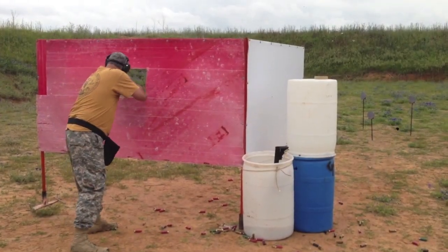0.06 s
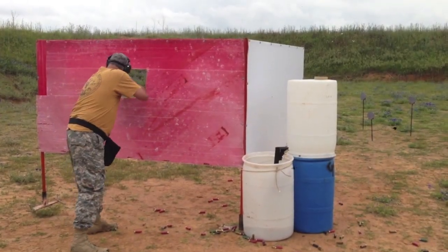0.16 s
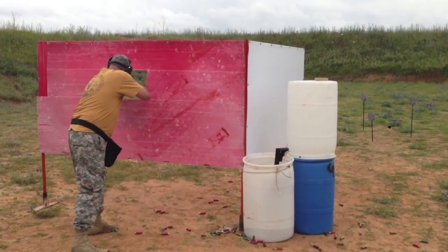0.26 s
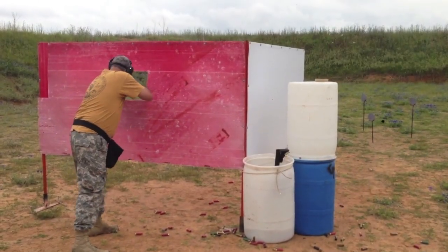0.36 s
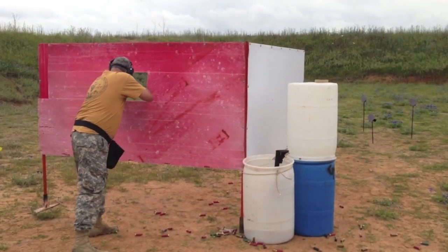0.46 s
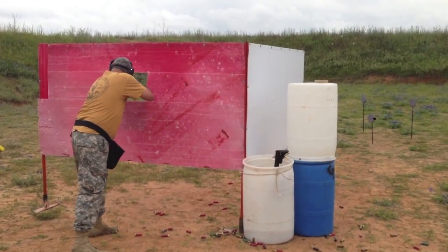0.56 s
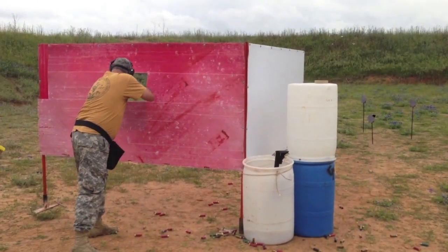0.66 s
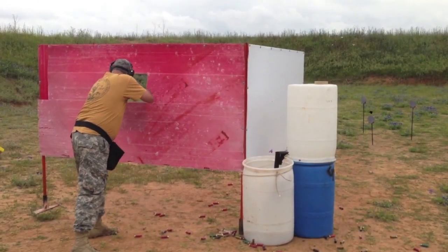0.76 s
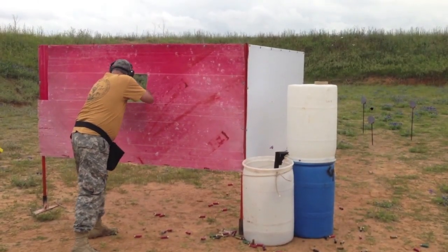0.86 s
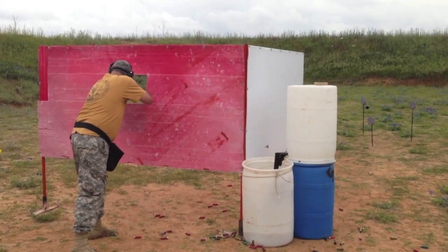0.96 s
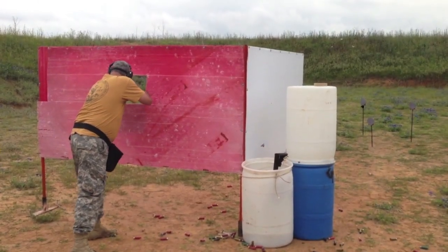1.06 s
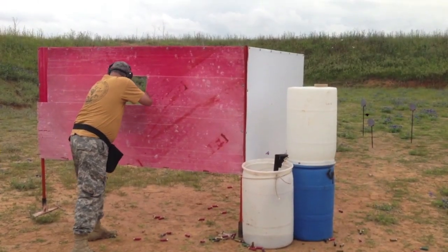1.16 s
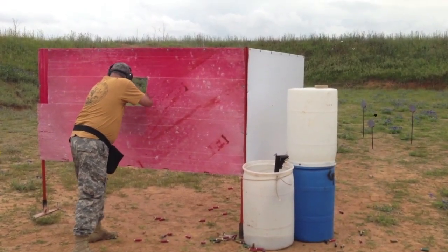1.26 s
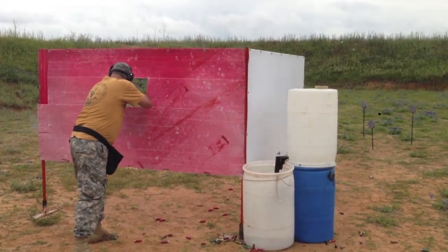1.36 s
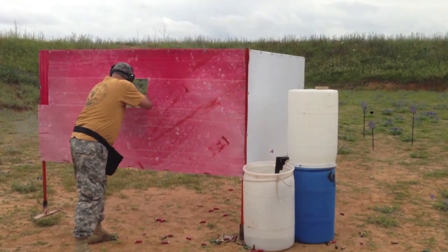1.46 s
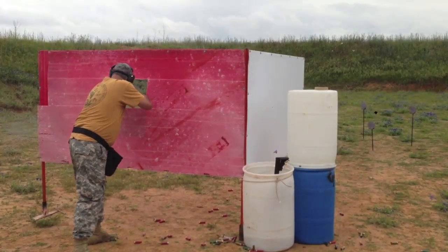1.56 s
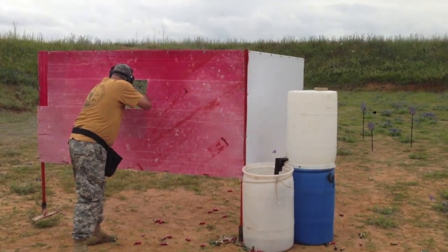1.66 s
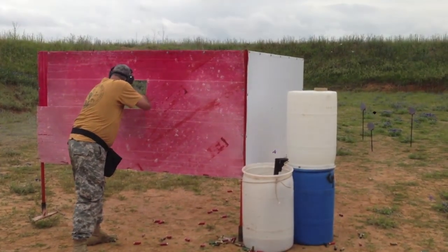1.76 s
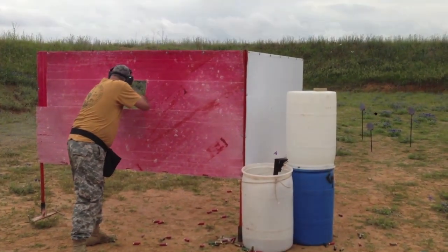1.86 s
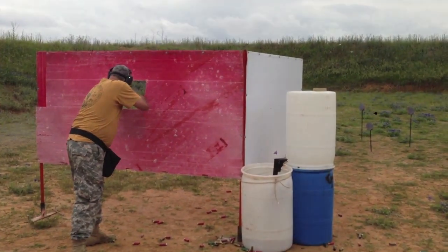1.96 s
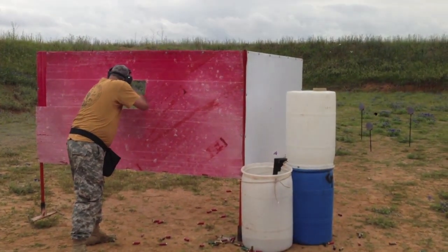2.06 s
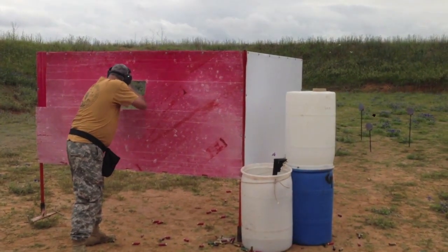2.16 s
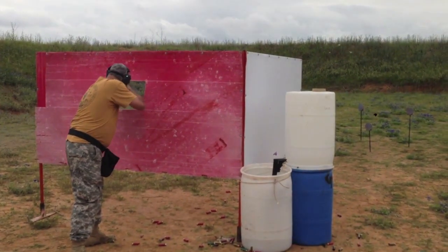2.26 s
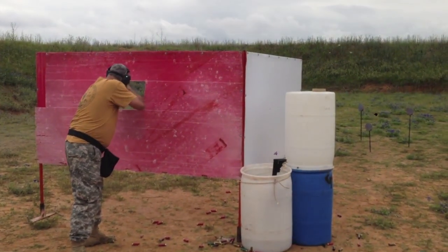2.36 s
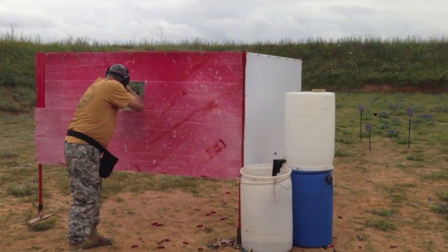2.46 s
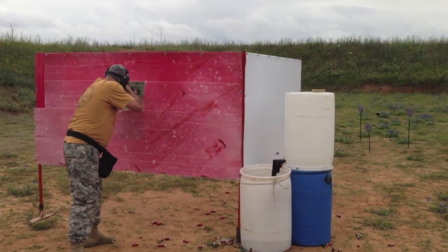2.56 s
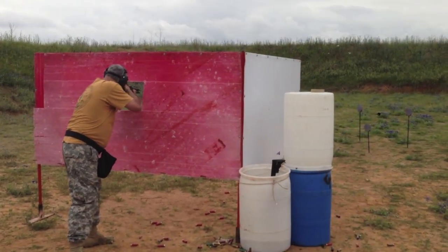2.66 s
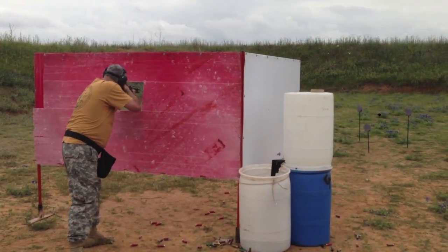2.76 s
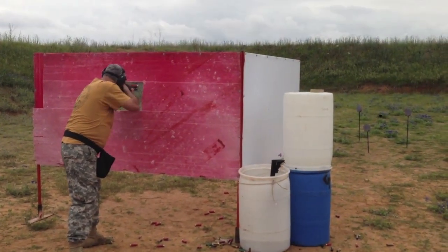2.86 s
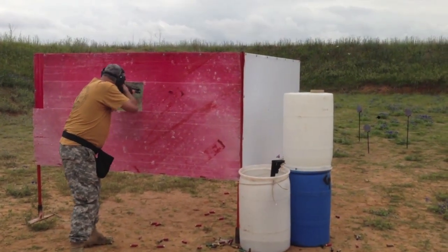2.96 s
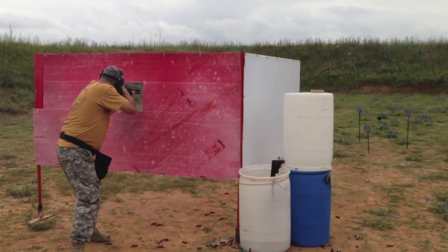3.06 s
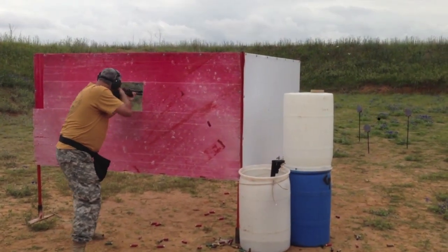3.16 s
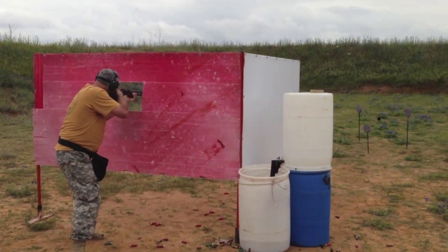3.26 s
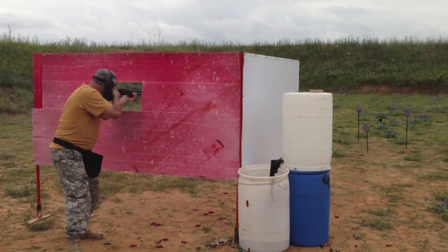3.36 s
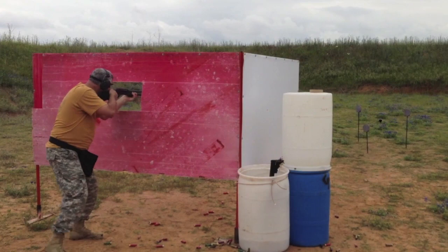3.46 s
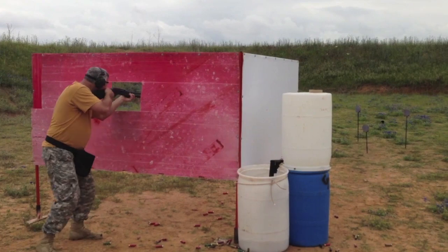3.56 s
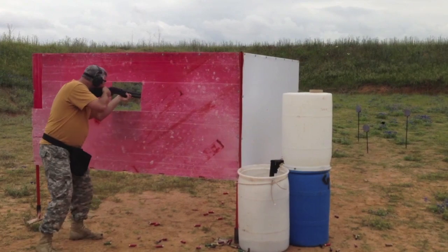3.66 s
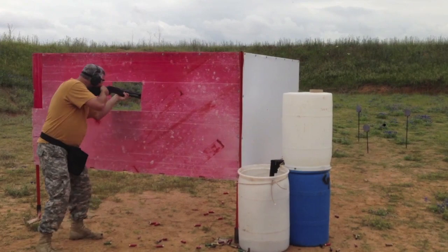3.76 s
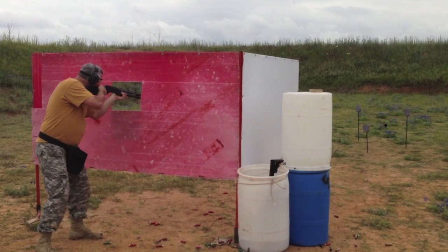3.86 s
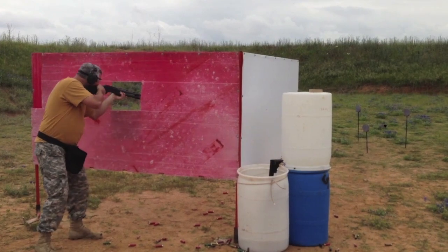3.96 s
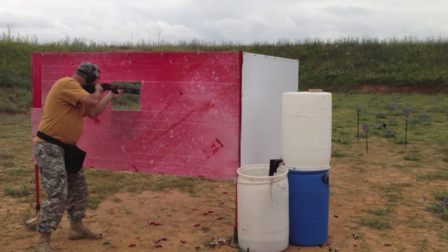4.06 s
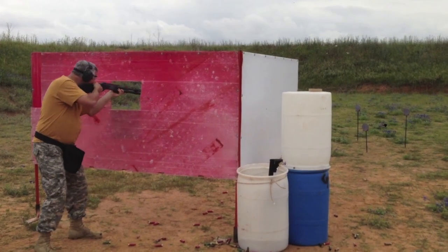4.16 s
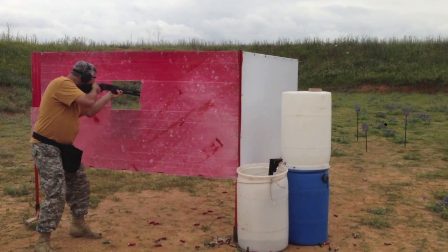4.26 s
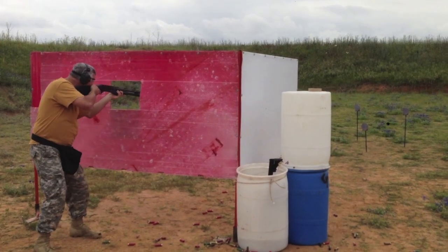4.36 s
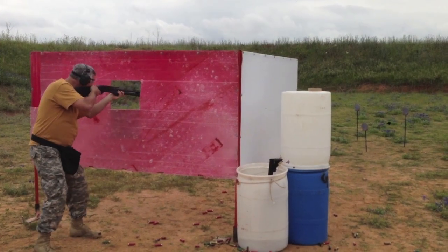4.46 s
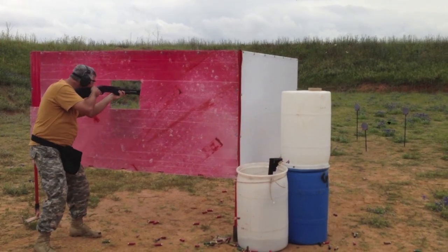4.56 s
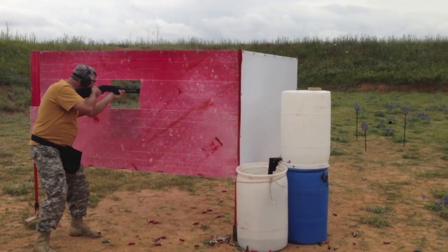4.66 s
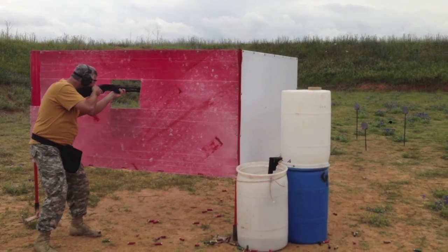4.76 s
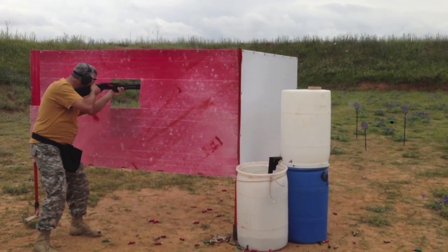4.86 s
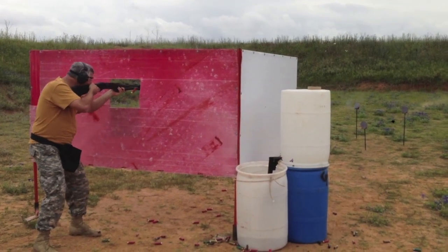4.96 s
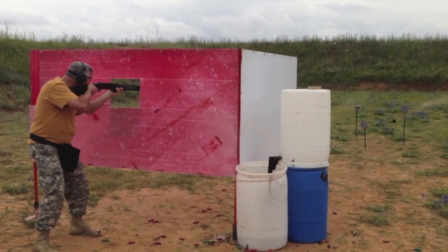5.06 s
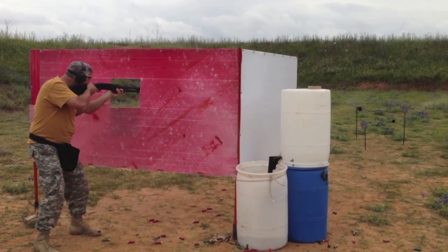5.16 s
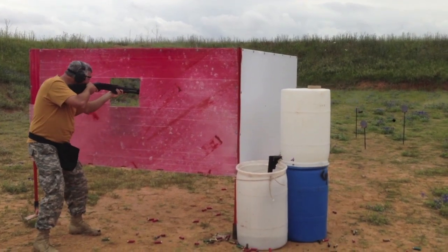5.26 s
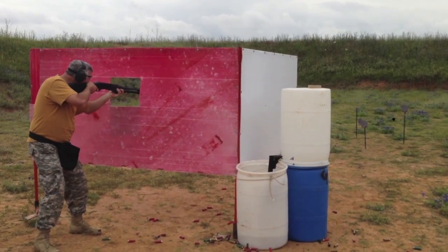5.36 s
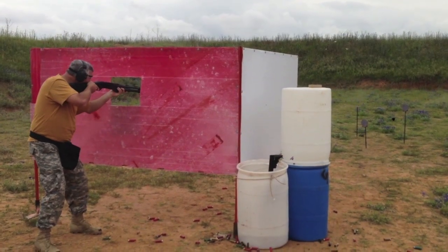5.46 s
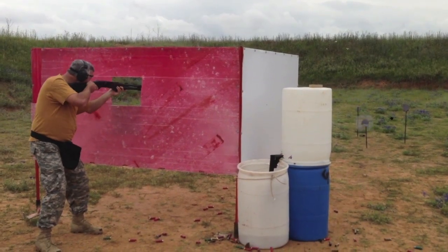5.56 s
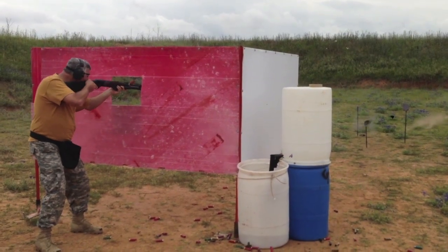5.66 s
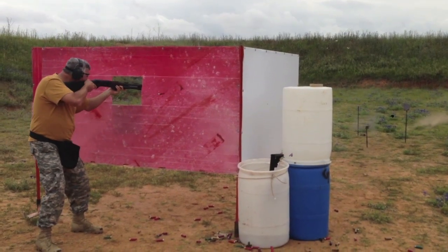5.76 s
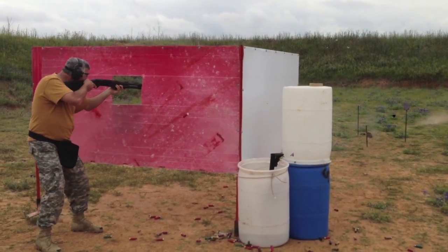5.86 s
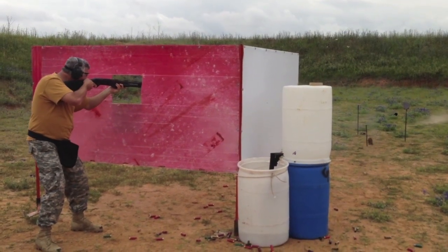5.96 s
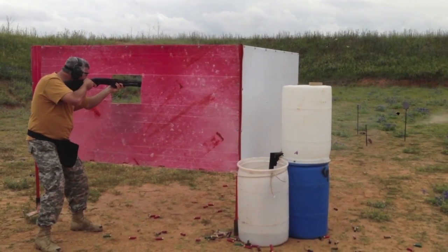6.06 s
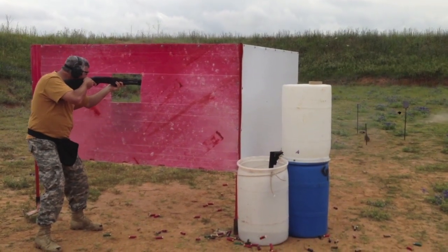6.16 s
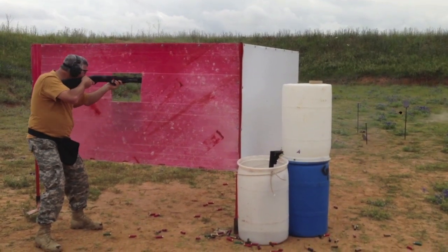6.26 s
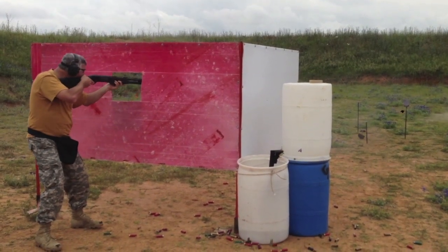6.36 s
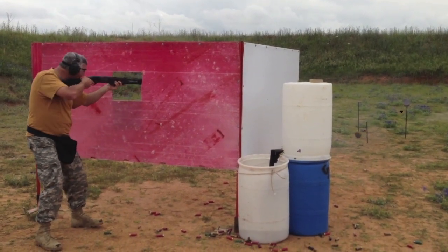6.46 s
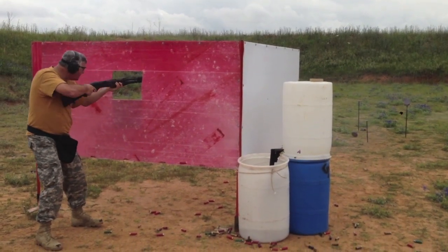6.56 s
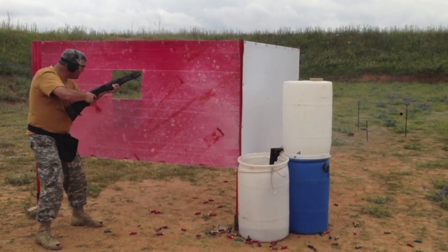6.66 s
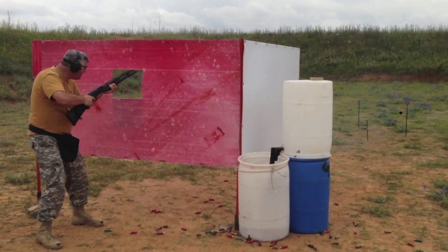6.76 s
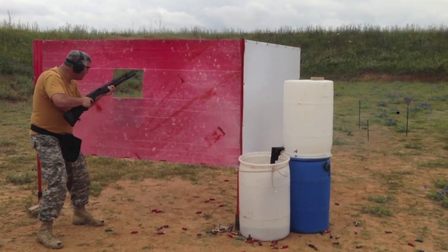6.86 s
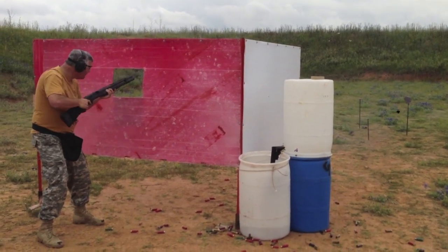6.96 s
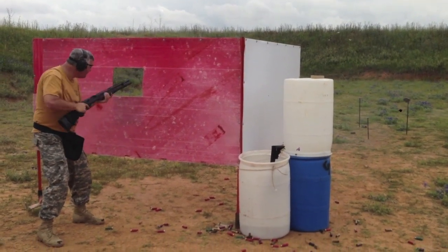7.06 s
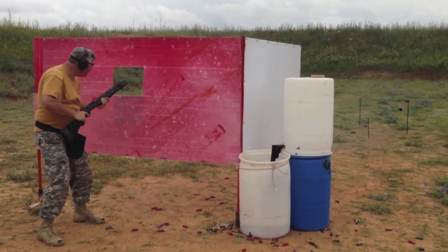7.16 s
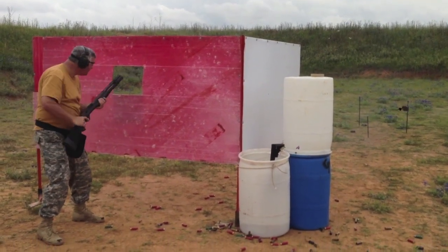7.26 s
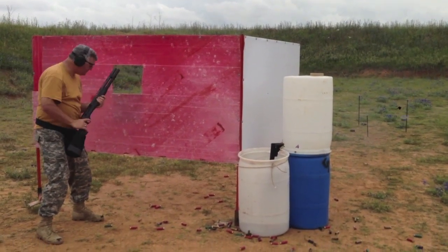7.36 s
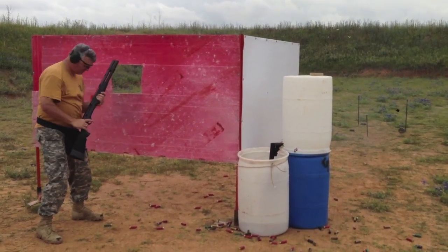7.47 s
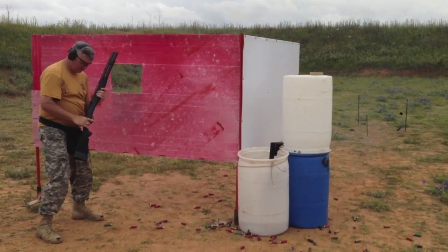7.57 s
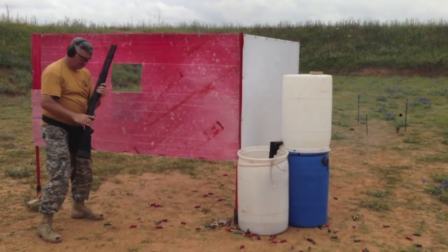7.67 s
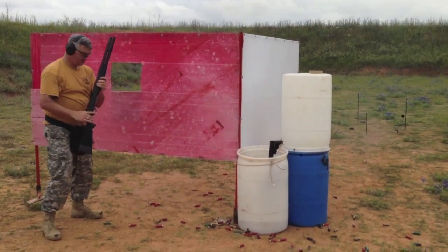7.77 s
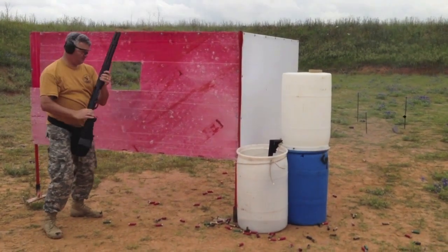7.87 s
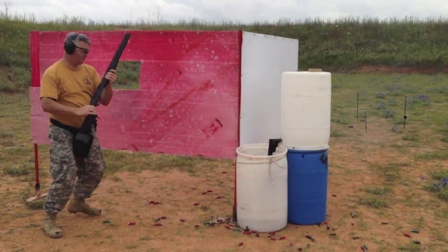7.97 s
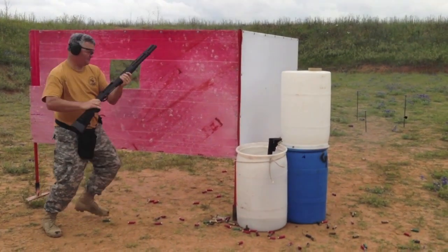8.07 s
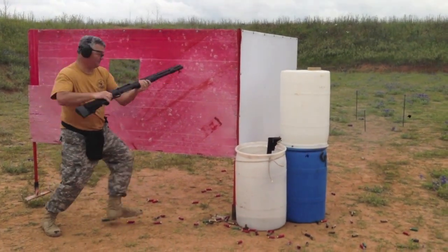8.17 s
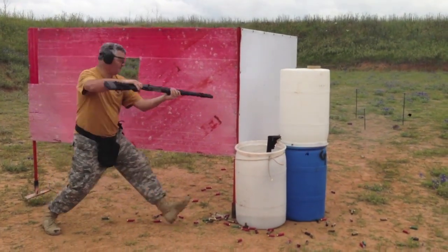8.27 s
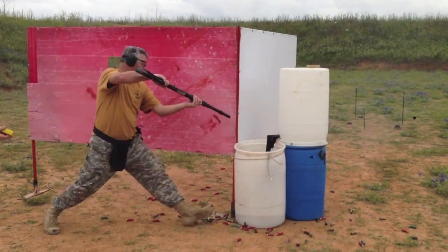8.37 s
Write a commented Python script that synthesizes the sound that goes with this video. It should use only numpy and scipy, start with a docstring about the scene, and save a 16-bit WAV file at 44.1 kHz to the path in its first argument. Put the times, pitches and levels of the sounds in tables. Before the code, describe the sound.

Quiet open air with soft thuds, a tiny tick and faint far chirps, then seven very loud shotgun blasts over about five seconds, three first, a short gap, then four. Each cracks, thumps and slaps back briefly from boards and earth banks, followed by metallic action clacks. Empty hulls knock on the ground and distant steel plates ring faintly. Afterwards only small clicks, a dull thud and light rustle remain. The microphone is outdoors, a few metres behind the shooter.

```python
"""Shotgun on an open range

Seven shots from a self-loading shotgun fired through a port in a board wall, heard from behind the wall.
Each blast is shaped noise with echoes, ringing boards and a low thump; the action and empty hulls clack.
Steel plates are fading tones that swell as they spin. Soft thuds are low tones, far birds are gliding
whistles, and the rustle, low murmur and open air are filtered noise."""
import sys
import numpy as np
from scipy import signal
from scipy.fft import rfft, irfft
from scipy.io import wavfile
from scipy.ndimage import uniform_filter1d

SR = 44100
rng = np.random.default_rng(int(sys.argv[2]) if len(sys.argv) > 2 else 0)


def volts_from_db(level):
    """Convert decibel levels to linear amplitude ratios."""
    exponent = np.asarray(level, float) / 20
    return 10 ** exponent


def master(y):
    """Save y as 16-bit WAV."""
    cut = np.clip(np.atleast_2d(y).T, -1, 1)
    pcm = np.round(cut * 32767)  # scale
    wavfile.write(sys.argv[1], SR, pcm.astype(np.int16))


N = 371322
TIME = np.arange(N) / SR

# blasts: (t/s, level/dB, thump relative level/dB, body relative level/dB, hammer falls this long before/s)
BLASTS = [(1.403, -1.35, -3.5, 1.5, .02), (2.1948, -2.2, -0.9, -1.5, .021),
          (2.9456, -2.1, -1.8, -1.5, .022), (4.1459, -1.7, -2.2, -0.5, .021),
          (4.9741, -1.7, -0.8, -1.4, .023), (5.682, -0.3, -3.5, -2.26, .02),
          (6.3301, -0.43, -3.4, -0.5, .026)]
# tone colour of the blast noise: (f/Hz, relative level/dB)
BLAST_COLOUR = [(150, -25), (250, -3), (499, -9), (624, -7), (961, -5), (1510, -8), (2200, -6),
                (2530, -10.5), (3450, -4.5), (11200, -16.5), (13500, -23), (15500, -30.5)]


def shots():
    """Pressure blasts meet the same reflectors each time, so much of their low scatter is alike."""
    out = np.zeros(N)
    before_s, length_s = .03, .73
    t = TIME[:int(length_s * SR)] - before_s
    gains = echoes(t)
    boom = thump(t, gains[-1])
    push = volts_from_db(-31.5) * ring(t - .004, 50, 0.023)  # a short deep push at the blast
    swell = volts_from_db(-34.5) * np.exp(-((t + 0.0027) / 0.0039) ** 2)
    common = colour(rng.standard_normal(len(t)), BLAST_COLOUR)
    for s, db, boom_db, body_db, lead in BLASTS:
        own = colour(rng.standard_normal((3, len(t))), BLAST_COLOUR)
        returned = scatter(t, common, own, gains, body_db)
        returned = np.clip((t + lead) / 0.0022, 0, 1) * returned  # silent until the hammer falls
        wall = volts_from_db(body_db) * boards(t)
        low = volts_from_db(boom_db) * (boom + push)
        barrel = swell * unit(band(own[1], 3000, 3200))  # it sings while the charge runs down it
        add(out, s + t[0], volts_from_db(db) * (returned + wall + low + barrel))
        add(out, s - lead, click(db=-31.0, hz=4000, knock_db=-14, hull_db=-41.5))  # the hammer falls
    return out


def scatter(t, common, own, gains, body_db):
    """Low, middle and treble noise follow the echo gains; uneven near reflectors blend with distance."""
    level, body, edge, _ = gains
    low = volts_from_db(body_db) * body * unit(band(1.4 * common + 0.53 * own[0], 220, 1900))
    # the soft ground swallows this band from later returns
    low = low - (1 - np.exp(-np.maximum(t, 0) / .09)) * band(low, 380, 620)
    middle = level * unit(band(own[1], 1500, 5500))
    treble = edge * unit(band(own[2], 6600, 23000))
    unevenness = np.exp(-np.maximum(t, 0) / 1.3)
    shared = walk(450, count=len(t))
    mix = 0
    for layer in (low, middle, treble):
        mix = mix + layer * volts_from_db(unevenness * (1.8 * shared + 2 * walk(250, count=len(t))))
    return mix + volts_from_db(3) * level * glints(count=70, span_s=.3)[:len(t)]


# blast and slaps from wall, drums and banks: (t after blast/s, level/dB, hold/s, body relative level/dB)
SLAP_ECHOES = [(.0022, -13, .0075, -4), (.015, -22, .002, -2.5), (0.021, -32, .004, 5.5),
               (.05, -31.5, .004, -5.5), (.078, -34, .024, -2.5), (0.142, -33.5, 0.0044, -25),
               (.194, -34.5, .008, -7), (0.208, -36, 0.024, -1.5)]


def echoes(t):
    """Gains of the middle, body, treble and bass roll: powers of all echo paths are summed."""
    rise_db_s, fall_db_s = 4200, 1500
    arrived = peak(t, .004, 1, rise_db_s, 0)
    bay = arrived * peak(t, -1, 1 + .235, 0, 450)  # the bay fades fast after its rear bank
    near = bay * volts_from_db(-28.5 - 85 * t)  # dense scatter from the ground inside the bay
    far = arrived * volts_from_db(-27.5 - 78 * t)  # scrub beyond the banks
    fizz = (t < .004) * volts_from_db(-38 + 450 * t)  # the charge burns in the barrel before the blast leaves
    level_parts, body_parts = [fizz, near, far], [fizz, volts_from_db(-3.5) * near, volts_from_db(-5) * far]
    for s, db, hold, body_db in SLAP_ECHOES:
        slap = volts_from_db(db) * peak(t, s, hold, rise_db_s, fall_db_s)
        level_parts.append(slap)
        body_parts.append(slap * volts_from_db(body_db))
    level, body = power_sum(*level_parts), power_sum(*body_parts)
    # the burning charge is dull, the shock front is brightest, and air dulls late returns
    front_db = 4 * np.exp(-((t - .001) / 0.0025) ** 2)
    edge = level * np.where(t < -.003, .5, 1) * volts_from_db(-1.5 - 17 * t + front_db)
    # the bass rolls on between the earth banks, and once more from a farther bank
    late = volts_from_db(-6) * peak(t, .35, .065, 560, 400)
    roll = volts_from_db(-33 - 36.5 * t) * power_sum(bay, volts_from_db(-14.5) * arrived, late)
    roll = roll * np.clip((t[-1] - t) / 0.4, 0, 1) ** 2
    return level, body, edge, roll


# low thump returned by single large faces: (t after blast/s, relative level/dB)
THUMP_ECHOES = [(.0005, -24.5), (.0095, -13), (0.03, -23), (.043, -32), (.062, -20), (.082, -27),
                (0.098, -25), (.12, -35.5), (.140, -32), (0.168, -38), (.192, -21), (0.211, -24.5),
                (0.229, -37.5), (0.287, -52)]
# tones in each thump: (f/Hz, relative level/dB, time to fade by 60 dB/s)
THUMP_MODES = [(178.2, -4, 0.097), (205, 2.5, 0.037), (298, -5.5, 0.021), (556, -8, 0.016)]


def thump(t, roll):
    """Large faces return short low tones, over a rolling bass noise."""
    boom = np.zeros(len(t))
    for s, db in THUMP_ECHOES:
        for hz, mode_db, t60 in THUMP_MODES:
            boom += volts_from_db(db + mode_db) * ring(t - s, hz, t60)
    noise = rng.standard_normal(len(t))
    boom = boom + roll * unit(band(band(noise, 150, 280), 150, 280))
    return band(band(boom, 150, 2100), 160, 4000)  # keep the thump above the deepest bass


# ringing tones of the board wall: (f/Hz, middle level/dB, time to fade by 60 dB/s)
BOARD_MODES = [(503, -17, 0.097), (1050, -24, 0.039), (1248, -20.5, 0.07), (1910, -16.5, 0.1),
               (2990, -22, 0.038), (4270, -21.5, .02)]


def boards(t):
    """The blast strikes boards at slightly different moments, and each rings at its own pitch."""
    wall = np.zeros(len(t))
    for hz, db, t60 in BOARD_MODES:
        detune, loudness, delay = rng.standard_normal(3)
        wall += volts_from_db(db + 3 * loudness) * ring(t - .004 - .0035 * delay, hz * (1 + 0.021 * detune), t60)
    return wall


def glints(count, span_s):
    """Posts, drums and stands each send back a few cycles in their own colour."""
    out, t = np.zeros(int(span_s * SR) + SR), TIME[:SR // 20]
    for at, pitch, size in rng.random((count, 3)):
        hz = 650 * 8 ** pitch
        add(out, at * span_s, (0.22 + 3 * size ** 3) * ring(t, hz, 22 / hz))
    return out


# bolt slams back, hull is thrown, bolt closes:
# (t/s, crack level/dB, crack f/Hz, hull tube relative level/dB before the trim in click)
ACTION_CLACKS = [(1.4396, -5.5, 3266, -0.5), (1.5433, -17, 3930, -25), (2.2256, -10, 3473, -8),
                 (2.2307, -10, 3730, -19.5), (2.3336, -13, 3960, -18), (2.9795, -9.5, 3086, -3),
                 (2.9887, -3.5, 4270, -11), (3.039, -21, 3290, -10), (3.059, -23, 4000, 2),
                 (3.0847, -14.5, 3473, -7), (3.1, -20.5, 3650, -20), (4.1799, -3, 2660, -6),
                 (4.1847, -8, 4380, -7), (4.1906, -11, 4485, -9), (4.2388, -12.5, 3350, -30),
                 (4.2779, -14.5, 3184, -25), (4.285, -18.5, 2800, 1), (5.012, -6.5, 4132, -21),
                 (5.0187, -9, 2580, -18.5), (5.0232, -4, 6500, -22), (5.0662, -23, 4410, -13),
                 (5.0874, -20, 3680, -2), (5.1064, -15.5, 3050, -8), (5.1119, -12, 3200, -11.5),
                 (5.7201, -2, 5572, -23.5), (5.7274, -9.5, 3390, -19.5), (5.7496, -19, 3705, -24),
                 (5.774, -21.5, 3404, -19), (5.7959, -15.5, 3780, -0.5), (5.8221, -7.5, 3440, -8.5),
                 (6.374, -8, 4200, -4), (6.3755, -2, 8900, -20), (6.3961, -17.5, 3170, -18),
                 (6.4427, -17, 3496, 4.5), (6.4686, -6, 3337, -12.5)]


def action():
    """Metal parts strike each other as the action cycles after each shot."""
    out = np.zeros(N)
    for s, db, hz, hull_db in ACTION_CLACKS:
        add(out, s, click(db, hz, knock_db=-16, hull_db=hull_db))
    return out


# empty hulls land and bounce:
# (t/s, crack level/dB, knock relative level/dB, hull tube relative level/dB before the trim in click)
HULL_LANDINGS = [(1.1634, -52, 0, -30), (1.8465, -52.5, 15, -2), (1.8643, -38, -8, -21),
                 (1.9064, -58, -11, -4), (2.1498, -48, -3.5, -3.5), (2.77, -52.5, -1.5, -2),
                 (3.612, -38.5, -8, 7.5), (3.6661, -48, -9, -2), (3.7645, -54, -9, 6),
                 (3.7931, -42, -26, -10), (3.8753, -59, -4, 5.5), (4.585, -30, 3.5, -3.5),
                 (4.7855, -38, -13.5, 3), (5.5417, -34, 4.5, 1), (5.5612, -28, 0, 5),
                 (5.6124, -44.5, .5, -10), (5.6395, -48.5, 1, -5.5), (6.9032, -41.5, -4, 1),
                 (7.6186, -54.5, 2, -13)]


def hulls():
    """An empty hull hits the ground with a crack and a knock, and its open tube rings."""
    out = np.zeros(N)
    for s, db, knock_db, hull_db in HULL_LANDINGS:
        add(out, s, click(db, 3820, knock_db, hull_db))
    return out


# dry ticks of gear and grit: (t/s, crack level/dB, crack f/Hz)
GEAR_TICKS = [(0.4141, -30.5, 2200), (0.4168, -31, 4650), (1.258, -42, 1980), (4.7526, -50.5, 3110),
              (5.4949, -34, 3400), (6.0874, -37.5, 4170), (6.212, -37, 3810), (6.2332, -44, 3700),
              (6.6999, -43, 4400), (6.8039, -47, 7070), (6.747, -44, 3900), (7.13, -58, 5000),
              (7.2669, -38, 4000), (7.405, -56, 5000), (7.6894, -57, 5200)]


def ticks():
    """Gear and grit make small cracks with hardly any knock or tube sound."""
    out = np.zeros(N)
    for s, db, hz in GEAR_TICKS:
        add(out, s, click(db, hz, knock_db=-23, hull_db=-26))
    return out


def click(db, hz, knock_db, hull_db):
    """A crack of metal, a duller knock and the open tube of a hull."""
    t = TIME[:SR // 5]
    # hard blows fall inside the action, where steel grips and damps the hull
    free = .4 if db > -25 else 1
    # contact builds within a millisecond, then the parts rattle out
    crack, knock = rng.standard_normal((2, len(t))) * np.minimum(t / 0.00052, 1)
    crack = crack * (1000 ** (-t / .009) + volts_from_db(-20) * 1000 ** (-t / 0.05))
    crack = band(crack, .7 * hz, 1.45 * hz) + .18 * band(crack, 1500, 14000)
    knock = knock * (1000 ** (-t / (.035 * free)) + volts_from_db(-10.5) * 1000 ** (-t / .12))
    knock = band(knock, 480, 1800)
    tube_hz = 1280 * (1 + .012 * rng.standard_normal())
    tube = volts_from_db(hull_db - 1.5) * ring(t, tube_hz, .045 * free)
    return volts_from_db(db) * (crack / abs(crack).max() + volts_from_db(knock_db) * knock / abs(knock).max() + tube)


# tones of struck, spinning steel plates:
# (t first facing/s, f/Hz, middle level at the start/dB, swells per second, t landed/s)
PLATE_TONES = [(1.68, 7773, -46, 10, 1.86), (2.385, 4075, -32, 7.7, 2.74), (3.37, 1895, -58, 3.2, 3.54),
               (5.045, 8300, -30, 11, 5.1), (6.01, 1744, -48, 4.5, 6.24), (5.845, 2030, -45, 9.7, 6.29),
               (5.86, 3009, -34, 7.1, 6.08), (5.88, 4161, -31, 7, 6.08), (7.41, 1583, -74, 3.9, 7.72)]


def plates():
    """Each tone is loud whenever a face points this way and dead once the plate hits the soil."""
    out = np.zeros(N)
    for facing, hz, db, turns, landed in PLATE_TONES:
        face = np.cos(np.pi * turns * (TIME - facing))
        in_air = np.clip((landed - TIME) / 0.061, 0, 1)
        t60 = 2.6 * (2000 / hz) ** 2  # seconds; an octave up fades in a quarter of the time
        tone = ring(TIME - facing + .5 / turns, hz, t60)
        out += volts_from_db(db + 2.5 * walk(40)) * face * in_air * tone
    return out


# dull thuds close by: (t/s, level before the final filter/dB, f/Hz)
SOFT_BLOWS = [(0.233, -55.5, 350), (0.394, -59, 218), (0.452, -48, 145), (0.489, -35.5, 162),
              (0.52, -46.5, 152), (1.077, -61, 137), (1.184, -44.5, 156), (1.239, -29.5, 257),
              (1.267, -38.5, 161), (2.049, -47.5, 210), (3.477, -42.5, 276), (3.701, -60, 193),
              (4.587, -46.5, 213), (5.641, -27, 240), (7.197, -58, 450), (7.62, -39.5, 202),
              (8.148, -64, 183)]


def thuds():
    """A soft blow: two low tones, the higher one fading sooner, with a short rumble."""
    out, t = np.zeros(N), TIME[:SR // 5]
    for s, db, hz in SOFT_BLOWS:
        blow = np.minimum(t / .003, 1) * (ring(t, hz, 0.031) + 0.29 * ring(t, 1.8 * hz, 0.02))
        rumble = unit(band(rng.standard_normal(len(t)), 110, 420)) * volts_from_db(-13.5) * 1000 ** (-t / 0.12)
        add(out, s, volts_from_db(db) * band(blow / abs(blow).max() + rumble, 95, 750))
    return out


# the shooter shifts his stance: (t of the middle/s, length/s, clothes level/dB, gravel level/dB)
STANCE_SHIFTS = [(0.246, 0.25, -77, -81), (1.284, 0.034, -64, -74), (1.906, 0.11, -71.5, -72),
                 (3.588, 0.14, -73, -66), (3.808, 0.044, -68, -72), (3.87, 0.097, -89.5, -69.5),
                 (3.945, 0.074, -66, -69.5), (4.6, 0.066, -69, -57), (4.836, 0.051, -75, -80),
                 (5.573, 0.049, -65, -53), (6.19, 0.034, -60, -68), (7.005, 0.047, -77, -74),
                 (7.999, .12, -80, -81), (7.883, 0.082, -76, -76), (8.08, 0.084, -77, -72),
                 (8.156, .05, -76.5, -65), (8.352, .14, -73, -75.5)]


def rustle(background):
    """Clothes and gravel rub in many tiny slips: quickly flickering noise over a rustling background."""
    clothes, gravel = volts_from_db(-2) * background, volts_from_db(-7.5) * background
    for s, length, clothes_db, gravel_db in STANCE_SHIFTS:
        move = np.exp(-(2 * (TIME - s) / length) ** 2)
        clothes = clothes + volts_from_db(clothes_db) * move
        gravel = gravel + volts_from_db(gravel_db) * move
    grain = 2 * walk(120)
    high = unit(band(rng.standard_normal(N), 2100, 6000))
    low = unit(band(rng.standard_normal(N), 480, 1050))
    return clothes * volts_from_db(grain + 2.0 * walk(24)) * high + gravel * volts_from_db(grain + 2.5 * walk(30)) * low


# far chirps: (t/s, length/s, start f/Hz, end f/Hz, middle level/dB)
CHIRPS = [(0.174, .02, 4170, 3300, -67), (0.528, 0.029, 4480, 3380, -64), (0.762, 0.03, 4400, 3500, -66.5),
          (1.927, 0.058, 4250, 3110, -62), (2.002, 0.04, 4000, 3950, -70),
          (4.821, 0.042, 3520, 3330, -60.5), (4.867, 0.029, 4200, 4170, -68.5),
          (4.901, 0.061, 3294, 3530, -63), (7.201, 0.042, 2980, 3000, -73.5),
          (7.582, 0.029, 3074, 3290, -67)]


def birds():
    """Short gliding whistles, roughened by the distance."""
    out = np.zeros(N)
    for s, length, from_hz, to_hz, db in CHIRPS:
        count = int(length * SR)
        hz = np.linspace(from_hz, to_hz, count) + 110 * walk(500, count=count)
        whistle = np.hanning(count) * np.sin(2 * np.pi * np.cumsum(hz) / SR)
        add(out, s, volts_from_db(db + 5 * walk(200, count=count)) * whistle)
    return out


# level of the low and rustling background noise: (t/s, level/dB)
BACKGROUND_LEVELS = [(0, -72.5), (.5, -73.5), (1.15, -73), (1.35, -65), (2.1, -80), (3.5, -73.5),
                     (3.75, -78.5), (5.5, -81), (5.62, -65.5), (6.9, -83), (7.6, -80), (7.7, -74),
                     (7.82, -78.5), (8.42, -73.5)]


def background_level():
    """Slowly changing level of the low and rustling background noise, as a gain."""
    return volts_from_db(np.interp(TIME, *np.transpose(BACKGROUND_LEVELS)))


def low_murmur(background):
    """Low background noise that flickers as it follows the background level."""
    return background * volts_from_db(walk(12)) * unit(band(band(rng.standard_normal(N), 120, 430), 100, 420))


# tone colour of the open air: (f/Hz, relative level/dB)
AIR_COLOUR = [(35, -47), (60, -17.5), (145, -2.5), (187, -3), (368, -14), (673, -5.5), (773, -11),
              (1420, -11), (4030, -9), (13800, -12), (15500, -15)]


def open_air():
    """Steady noise of the open range."""
    return volts_from_db(-68) * unit(colour(rng.standard_normal(N), AIR_COLOUR))


def colour(x, points):
    """Shape noise along its last axis by (f/Hz, level/dB) points."""
    hz, db = np.transpose(points)
    f = np.fft.rfftfreq(x.shape[-1], 1 / SR) + 1
    return irfft(rfft(x) * volts_from_db(np.interp(np.log(f), np.log(hz), db)), x.shape[-1])


def band(x, lo_hz, hi_hz):
    """Butterworth band-pass."""
    return signal.sosfilt(signal.butter(2, [lo_hz, min(hi_hz, .45 * SR)], "band", fs=SR, output="sos"), x)


def unit(x):
    """Scale to rms 1."""
    return x / np.sqrt(np.mean(x ** 2))


def ring(t, hz, t60):
    """One tone struck at t = 0, fading by 60 dB in t60 seconds."""
    return (t >= 0) * np.sin(2 * np.pi * hz * t) * 1000 ** (-np.maximum(t, 0) / t60)


def peak(t, s, hold, rise_db, fall_db):
    """Gain 1 from s to s + hold, with flanks of so many dB a second."""
    return volts_from_db(rise_db * np.minimum(t - s, 0) - fall_db * np.maximum(t - s - hold, 0))


def power_sum(*parts):
    """Gain of unrelated sounds together: their powers add."""
    return np.sqrt(sum(part ** 2 for part in parts))


def walk(rate, count=N):
    """Smooth random wander around 0: a new random target every 1 / rate seconds."""
    k = int(SR / rate)
    steps = np.repeat(rng.standard_normal(count // k + 1), k)
    return 0.99 * uniform_filter1d(steps, k)[:count]


def add(out, s, sound):
    """Mix a sound in at time s."""
    i = int(s * SR)
    out[i:i + len(sound)] += sound[:len(out) - i]


def scene():
    """All sources at one microphone."""
    background = background_level()
    gun = shots() + action() + hulls()
    nearby = ticks() + plates() + thuds() + rustle(background)
    return (gun + nearby + birds() + low_murmur(background) + open_air())[None]


def band_limit(x):
    """A steep low-pass at the top of the band."""
    return signal.sosfilt(signal.butter(12, 16470, fs=SR, output="sos"), x)


def record(dry):
    """Cut the deepest bass, round the loudest peaks, then cut the top."""
    cut = signal.sosfilt(signal.butter(2, 45, "high", fs=SR, output="sos"), dry)
    rounded = np.tanh(1.072 * cut) / 1.19
    mix = signal.sosfilt(signal.cheby1(8, 1, 15200, fs=SR, output="sos"), rounded)
    return band_limit(mix)


dry = scene()
out = record(dry)
master(out)
```